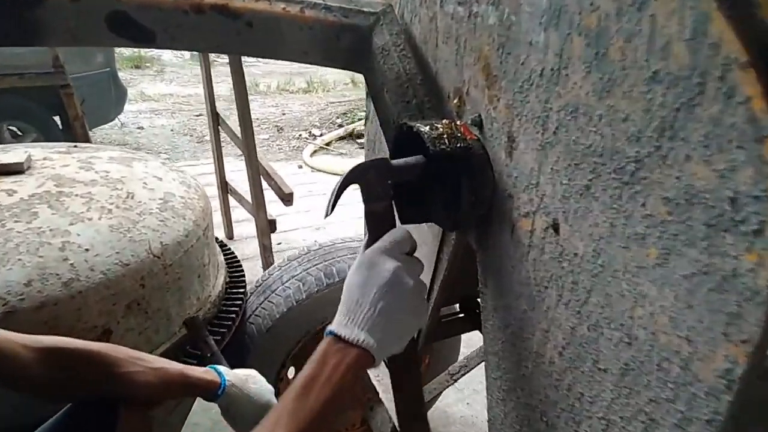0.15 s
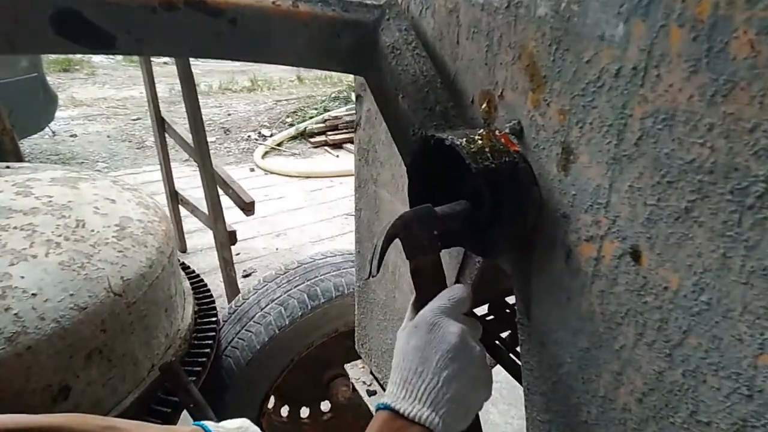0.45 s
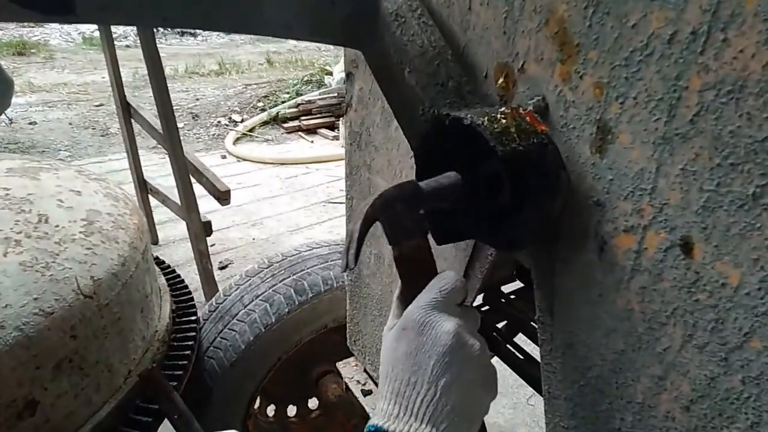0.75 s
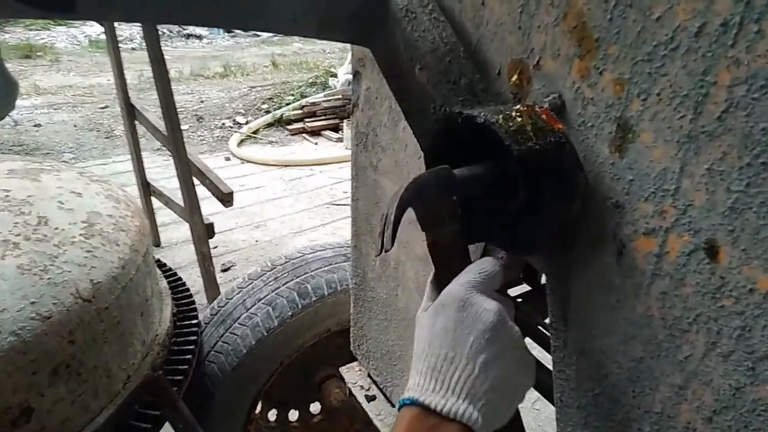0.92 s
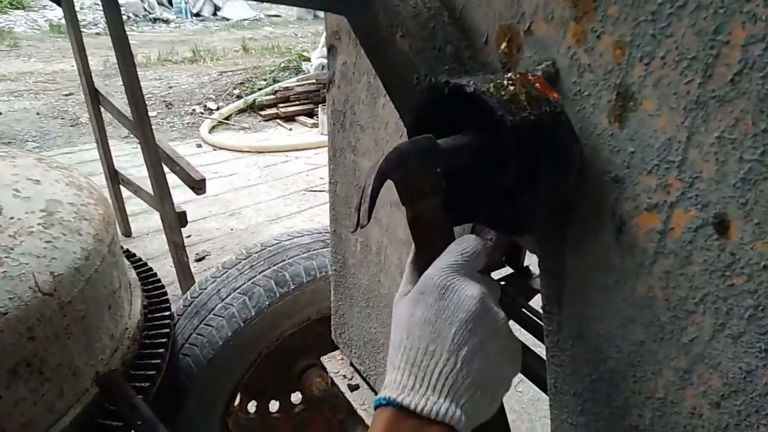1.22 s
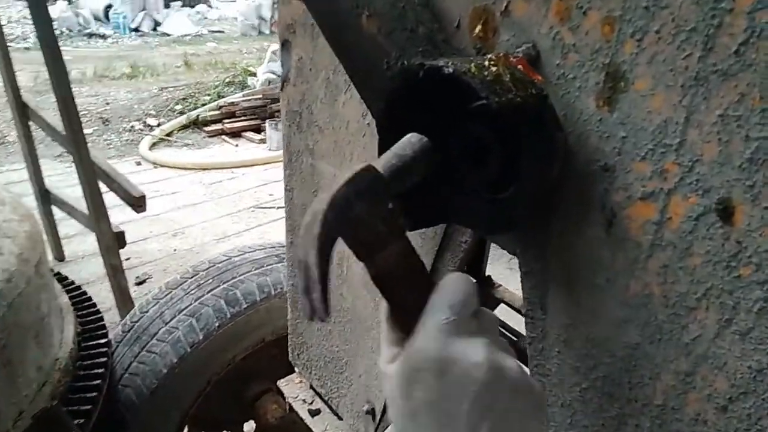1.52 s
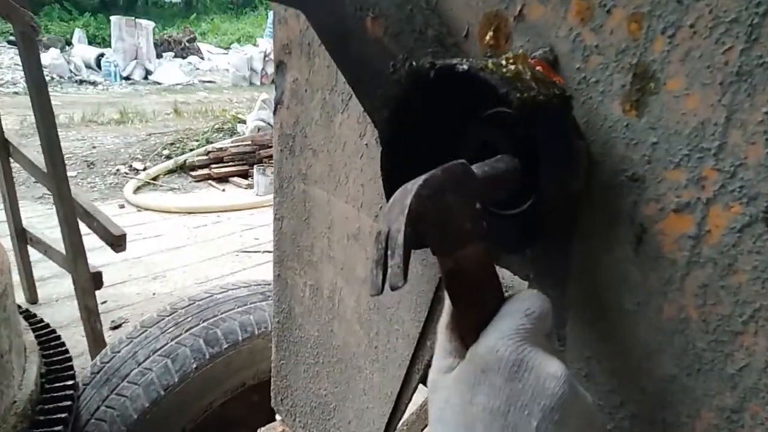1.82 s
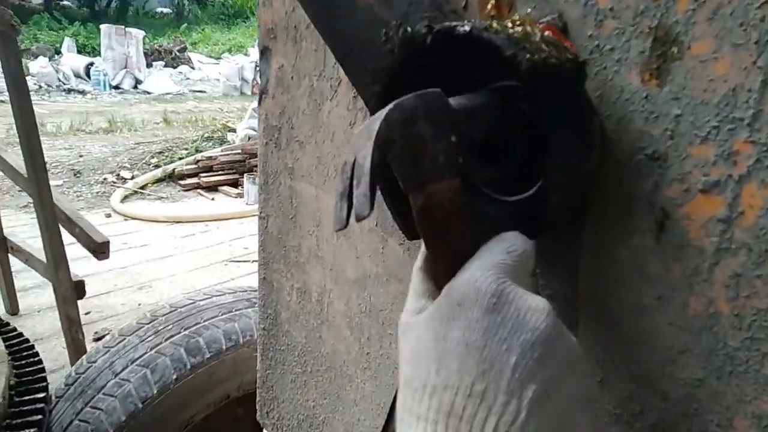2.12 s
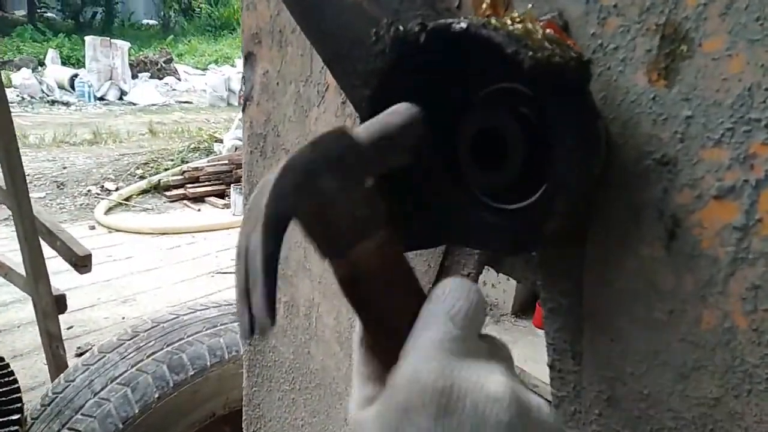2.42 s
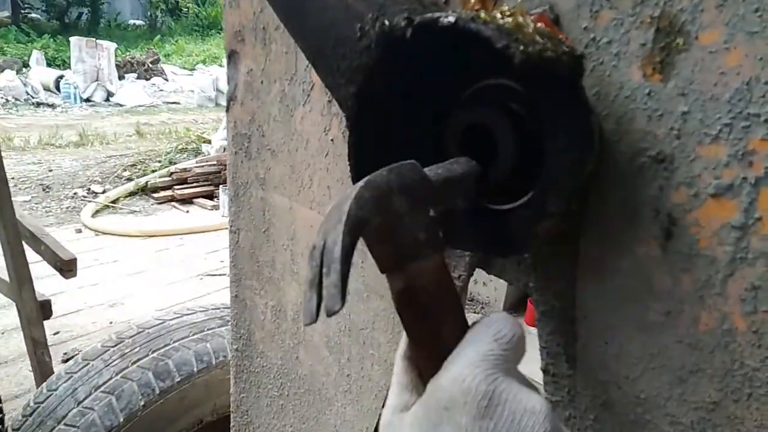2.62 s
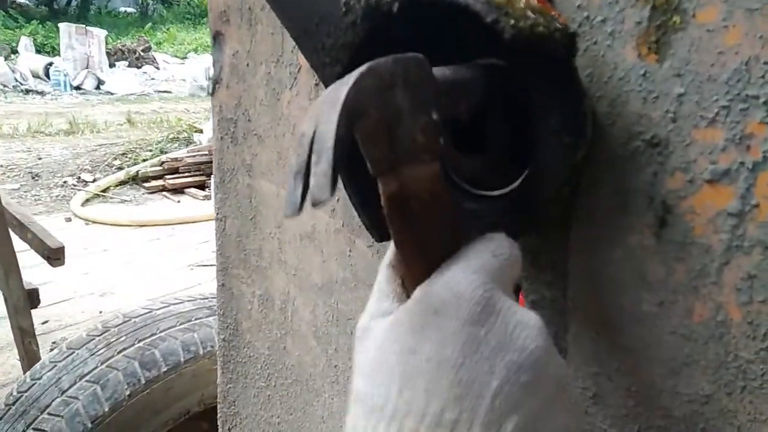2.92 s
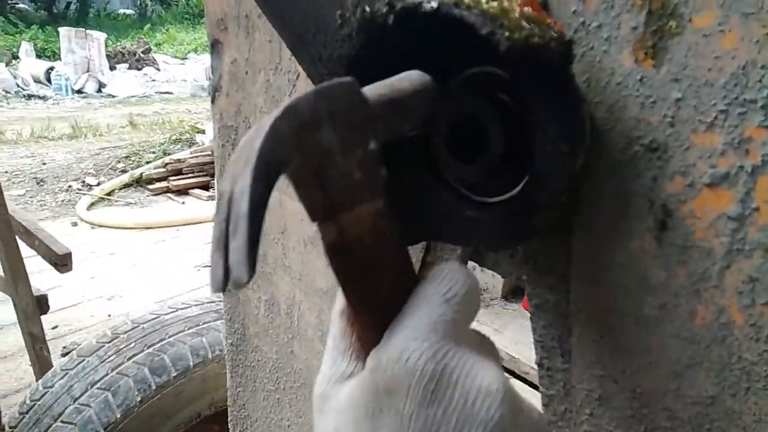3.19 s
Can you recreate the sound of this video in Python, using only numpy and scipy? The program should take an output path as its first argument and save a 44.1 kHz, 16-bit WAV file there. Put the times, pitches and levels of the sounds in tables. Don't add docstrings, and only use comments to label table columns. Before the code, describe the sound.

Hammer blows on steel crack and ring, driving a bearing into its housing with plate booming

```python
import sys
import numpy as np
from scipy import signal
from scipy.fft import rfft, irfft, next_fast_len
from scipy.io import wavfile
from scipy.ndimage import uniform_filter1d, map_coordinates

SR = 44100
rng = np.random.default_rng(int(sys.argv[2]) if len(sys.argv) > 2 else 0)


def store_pcm(level_fs):
    pcm = np.round(np.clip(level_fs, -1, 1) * 32767).astype(np.int16)
    wavfile.write(sys.argv[1], SR, np.atleast_2d(pcm).T)


def amplitude_ratio(level_db):
    exponent = np.asarray(level_db, float) / 20
    return 10 ** exponent


N = 147735
LEAD_S = 0.3

# (time [s], force [dB], brightness [dB per octave], long bearing ring [dB], plate [dB])
BLOWS = [
    (-.11, -13, 1, -55, -0.5),
    (0.3565, -2.5, 1.5, -62, -1),
    (0.9325, 0, 1.1, -60, -2),
    (1.5938, -0.5, 0.6, -53, -1),
    (2.1002, -2, -0.1, -32.5, -0.5),
    (2.5057, 1.5, 0.3, -23.5, 0),
    (2.8935, -1, 0.3, -19.5, -2.5),
]


def unit(x):
    return x / np.sqrt(np.mean(x ** 2) + 1e-20)


def along(points, hz):
    f, v = np.transpose(points)
    return np.interp(np.log(hz + 1), np.log(f + 1), v)


def wobble(rate, size):
    knots = rng.standard_normal(int(size / SR * 40) + 4)
    return map_coordinates(knots, [np.arange(size) * min(rate, 39) / SR])


def filtered(x, response):
    m = next_fast_len(len(x) + 8192)
    return irfft(rfft(x, m) * response(np.fft.rfftfreq(m, 1 / SR)), m)[:len(x)]


def rush(spectrum, size):
    noise = rng.standard_normal(size)
    return unit(filtered(noise, lambda hz: amplitude_ratio(along(spectrum, hz) - 60 * (hz < 18))))


def dying(spectrum, t60s, size, tilt_db, patchy_db=2.5):
    hz, t, z = signal.stft(rush(spectrum, size), SR, nperseg=256)
    clusters = unit(uniform_filter1d(rng.standard_normal(z.shape), 24, axis=1))
    tilt = tilt_db * np.log2(1 + hz / 2000)[:, None]
    decay = 60 * t / along(t60s, hz)[:, None]
    return signal.istft(z * amplitude_ratio(tilt + patchy_db * clusters - decay), SR, nperseg=256)[1][:size]


def ringing(modes, t, spread_db, drift, beat_db):
    smear_per_s = 30
    out = np.zeros(len(t))
    for hz, db, t60 in modes:
        level_db = db + spread_db * rng.normal() + beat_db * wobble(smear_per_s, len(t))
        phase = 2 * np.pi * hz * t + drift * wobble(smear_per_s, len(t))
        out += amplitude_ratio(level_db - 60 * t / t60) * np.sin(phase)
    return out


def add(track, s, x):
    part = track[round((s + LEAD_S) * SR):][:len(x)]
    part += x[:len(part)]


def crack(t):
    level_db, t60 = -5, 0.0046
    return amplitude_ratio(level_db - 60 * t / t60) * rush([(2000, -36), (9000, -26), (14000, 22)], len(t))


def clang(t, clang_db, tilt_db):
    # (frequency [Hz], density [dB per Hz])
    colour = [(59, -11), (100, -4.5), (891, -12.5), (1030, -8), (1480, -8), (1680, -9.5), (5650, -21),
              (8280, -19), (16000, -13)]
    # (frequency [Hz], t60 [s])
    t60s = [(300, 0.18), (2000, 0.3), (8000, .13), (14000, 0.07)]
    return amplitude_ratio(-6 + clang_db) * dying(colour, t60s, len(t), tilt_db)


def plate_boom(t, plate_db, lasts, tilt_db):
    # (frequency [Hz], density [dB per Hz])
    colour = [(35, -42), (60, -21), (180, -5.5), (408, -8.5), (515, -2.5), (749, -2.5), (5720, -25.5),
              (7060, -21.5), (16000, -25.5)]
    # (frequency [Hz], t60 [s])
    t60s = [(100, 1.58), (400, 0.87), (1500, 0.69), (5000, 0.48), (14000, 0.36)]
    rise_s = 0.072
    boom = dying(colour, np.multiply(t60s, [1, lasts]), len(t), tilt_db)
    return amplitude_ratio(-12 + plate_db) * boom * (1 - np.exp(-t / rise_s))


def struck_tones(t, s, ring_db, level_db, head_db):
    # (frequency [Hz], level [dB], t60 [s])
    housing = [(200.1, -22.5, 1), (247, -32.5, 1), (527.4, -28, 0.86), (590, -23, 0.95), (688.5, -20, 0.56),
               (741, -21, 0.65), (1039, -19.5, 0.68), (1620, -25, 0.66), (2323, -22.5, 0.43),
               (3063, -49, 0.14), (3620, -41, 0.4), (1190, -28, 0.71), (8030, -43, 0.35), (177, -29, 1)]
    # (blow time [s], frequency [Hz], level [dB], t60 [s])
    chance = [(-.11, 7800, -41, 0.42), (-.11, 3160, -42, 1.48), (.356, 1686, -6.5, 0.2),
              (.356, 2100, -17, .25), (.356, 3400, -14, 0.11), (.356, 1026, -14.5, 0.4),
              (.356, 8400, -15, 0.11), (.356, 3850, -23, 0.26), (.356, 9100, -13, 0.081),
              (.932, 630, -14.5, 0.43), (.932, 1034, -18, 0.11), (.932, 907, -21, 0.45),
              (.932, 1645, -5.5, 0.12), (.932, 2267, -5.5, 0.1), (.932, 3063, -27, 0.28),
              (.932, 4300, -10.5, 0.056), (.932, 7300, -19, 0.081), (1.593, 1034, -9, 0.3),
              (1.593, 2260, -13, 0.2), (1.593, 3666, -4, 0.061), (1.593, 4000, -13.5, 0.1),
              (1.593, 2600, -15, 0.2), (1.593, 2950, -19, 0.14), (1.593, 4380, -13, 0.08),
              (1.593, 5500, -28, 0.1), (2.1, 1590, -13, 0.23), (2.1, 1053, -18, 0.18),
              (2.1, 3800, -13.5, 0.075), (2.1, 4670, -6, 0.05), (2.1, 4300, -15, 0.051),
              (2.1, 2300, -9, 0.15), (2.1, 7860, -23, 0.22), (2.506, 188.3, -21.5, 0.6),
              (2.506, 1040, -11, 0.11), (2.506, 2312, -13.5, 0.26), (2.506, 4740, -8, 0.086),
              (2.506, 3810, -7, 0.051), (2.506, 3030, -22, 0.36), (2.506, 1760, -11, 0.096),
              (2.506, 4230, -16, 0.07), (2.893, 976, -4, 0.042), (2.893, 1350, -27, 0.16),
              (2.893, 4750, 2, 0.037), (2.893, 8160, -14.5, 0.13), (2.893, 8360, -19, .08),
              (2.893, 194, -22, 0.64)]
    # (frequency [Hz], density [dB per Hz])
    head = [(7000, -28), (7900, -6), (8500, 0), (9300, -4.5), (10300, -20)]
    head_t60 = 0.44
    own = [mode for blow_s, *mode in chance if abs(blow_s - s) < 0.1]
    bearing, thud = (6923, ring_db, 0.75), (55, -18, 0.048)  # (frequency [Hz], level [dB], t60 [s])
    tones = amplitude_ratio(level_db) * ringing(housing, t, spread_db=1, drift=2, beat_db=3)
    tones += ringing(own, t, spread_db=0, drift=1.1, beat_db=3)
    tones += ringing([bearing, thud], t, spread_db=0, drift=0.09, beat_db=0)
    tones += amplitude_ratio(head_db - 60 * t / head_t60) * rush(head, len(t))
    return tones * (1 - np.exp(-t / 0.0023))


def hammer(size):
    head_dbs = [-33.5, -26, -43, -41, -35, -34, -31]
    # (clang [dB], housing [dB], plate decay over its usual length [ratio])
    landing = [(2, 3, 1.06), (-0.5, 0, 1.03), (-0.5, 1.5, 0.97), (1.5, 0, 1.003), (1.5, -1.3, 1.004),
               (3.7, -1, 1.02), (0.7, -0.5, 1.028)]
    # (frequency [Hz], width [octaves], level [dB])
    wakes = [(1500, 0.86, 3.5), (2590, 1, 1.5), (1140, 1, 2), (2930, 0.73, 0), (3530, 1, 0.5),
             (3000, 0.7, 0), (380, 0.73, 3)]
    out, t = np.zeros(size), np.arange(SR) / SR
    for blow, head_db, place, (mid_hz, octaves, mid_db) in zip(BLOWS, head_dbs, landing, wakes):
        s, force_db, tilt_db, ring_db, plate_db = blow
        clang_db, housing_db, lasts = place

        def woken(hz):
            return amplitude_ratio(mid_db * np.exp(-(np.log2((hz + 1) / mid_hz) / octaves) ** 2))

        body = clang(t, clang_db, tilt_db) + plate_boom(t, plate_db, lasts, tilt_db)
        tones = struck_tones(t, s, ring_db, plate_db + housing_db, head_db)
        add(out, s, amplitude_ratio(force_db) * (crack(t) + filtered(body, woken) + tones))
    return out


def jolts(size):
    pushes = [0.017, 0.00097, 0.022, 0.0022, 0.025, 0.0093, 0.035]
    dip_s, back_s, back = 0.03, 0.039, 0.94
    out, t = np.zeros(size), np.arange(SR // 2) / SR
    u, v = t / dip_s, t / back_s / 3
    swing = back * (v * np.exp(1 - v)) ** 3 - 1.1 * (u * np.exp(1 - u)) ** 2
    for (s, *_), push in zip(BLOWS, pushes):
        add(out, s, push * swing)
    return out


def yard(size):
    # (frequency [Hz], density [dB per Hz])
    hum = [(15, 0), (25, -40), (185, -11.5), (317, -18.5), (695, -14), (840, -26), (1040, -22), (5730, -49),
           (16000, -58)]
    # (frequency [Hz], density [dB per Hz])
    buffeting = [(20, 24), (45, 20.5), (110, 21), (250, -25)]
    # (time [s], level [dB])
    wind = [(0.0, -46), (0.09, -62), (0.56, -40), (0.58, -38), (0.71, -48), (0.94, -35), (1.0, -43),
            (1.24, -38.5), (1.29, -47), (1.41, -36.5), (1.44, -48), (1.6, -27), (1.62, -34), (1.85, -37.5),
            (1.98, -57), (2.01, -37), (3.26, -43), (3.35, -44)]
    wind_db = np.interp(np.arange(size) / SR - LEAD_S, *np.transpose(wind))
    gusts = unit(amplitude_ratio(0.33 * wobble(24.87, size)) * rush(buffeting, size))
    far = amplitude_ratio(-46 + 2.5 * wobble(3.357, size)) * rush(hum, size)
    return far + amplitude_ratio(-5 + wind_db) * gusts


def flakes(size):
    # (time [s], peak level [dB])
    ticks = [(0.0324, -49), (0.0762, -43), (0.1151, -56), (0.13, -46), (0.26, -55), (0.6679, -41),
             (0.7168, -48), (0.7506, -47.5), (0.768, -45.5), (0.8544, -43.5), (0.8784, -66), (0.9023, -47),
             (1.0276, -34), (1.1877, -40), (1.297, -38.5), (1.3225, -42), (1.38, -43.5), (1.4935, -56),
             (1.508, -37.5), (1.562, -39), (1.6935, -23), (1.888, -41), (1.9035, -39.5), (1.953, -40.5),
             (2.0385, -42.5), (2.05, -49), (2.364, -36), (2.376, -39), (2.4169, -42.5), (2.45, -48),
             (2.466, -42), (2.477, -40), (2.683, -30), (2.745, -33), (2.755, -46), (2.7671, -33),
             (2.822, -40.5), (2.8474, -39), (2.873, -33), (3.1213, -45), (3.223, -41), (3.234, -42),
             (3.26, -38.5), (3.285, -45), (3.32, -55), (3.345, -51)]
    # (frequency [Hz], density [dB per Hz])
    colour = [(1500, -11), (4000, -3.5), (8500, -4), (11500, -8), (14500, -9), (16000, 4.5)]
    tick_t60, tail_t60, tail_db, all_db = 0.032, 0.22, -6.5, -4.5
    out, t = np.zeros(size), np.arange(SR // 5) / SR
    tick = amplitude_ratio(-60 * t / tick_t60) * np.minimum(t / 0.0015, 1)
    tail = amplitude_ratio(tail_db - 60 * t / tail_t60)
    for s, db in ticks:
        add(out, s, amplitude_ratio(db + all_db) * (tick + tail) * rush(colour, len(t)))
    return out


def singing(size):
    # (blow time [s], frequency [Hz], level [dB], t60 [s])
    thin = [(.356, 593, -23.5, 0.76), (.356, 2520, -24, .3), (.356, 4250, -27, .2), (.932, 1136, -26, 0.67),
            (.932, 8100, -29, 0.27), (0.931, 6000, -19, .12), (1.593, 3667, -11, .1),
            (1.593, 3730, -23, 0.36), (1.593, 4750, -18, 0.095), (1.593, 7240, -26, 0.33),
            (1.593, 3460, -27.5, .4), (2.099, 4760, -29, 0.43), (2.101, 8030, -28, 0.44),
            (2.1, 8100, -13, 0.034), (2.506, 4740, -30, 0.42), (2.506, 3640, -31, .35),
            (2.894, 4800, -30, 0.38), (2.893, 8200, -29, .35)]
    out, t = np.zeros(size), np.arange(SR) / SR
    for s, *mode in thin:
        tone = ringing([mode], t, spread_db=0, drift=0.5, beat_db=2)
        add(out, s, tone * (1 - np.exp(-t / 0.003)))
    return out


def handling(size):
    # (time [s], level [dB])
    bumps = [
        (0.592, -39),
        (1.215, -27),
    ]
    bump_hz, bump_s = 88, 0.0115
    out, t = np.zeros(size), np.arange(SR // 10) / SR
    bump = np.exp(-(t / bump_s - 3) ** 2) * np.sin(2 * np.pi * bump_hz * t)
    for s, db in bumps:
        add(out, s - 3 * bump_s, amplitude_ratio(db) * bump)
    return out


def squeak(size):
    start_s, length_s, start_hz, rise_hz, level_db = 1.56, 0.035, 1080, 170, -43
    out, t = np.zeros(size), np.arange(SR // 10) / SR
    u = np.clip(t / length_s, 0, 1)
    tone = np.sin(2 * np.pi * np.cumsum(start_hz + rise_hz * u) / SR)
    add(out, start_s, amplitude_ratio(level_db) * u * (u < 1) * tone)
    return out


def scene():
    size = N + round(LEAD_S * SR)
    mix = hammer(size) + yard(size) + flakes(size) + singing(size) + handling(size) + squeak(size)
    return mix[None, -N:]


def port(x):
    # (frequency [Hz], width [Hz], level [dB])
    bands = [(8420, 990, 6.5), (14370, 1800, 4.5), (4000, 270, 2.5), (5640, 270, -0.5)]
    return filtered(x, lambda hz: amplitude_ratio(sum(db * np.exp(-((hz - mid) / width) ** 2) for mid, width, db in bands)))


def ducked(x, knee_db, share, sense_s, release_db_per_s):
    span = round(sense_s * SR)
    power = uniform_filter1d(x ** 2, span, origin=span // 2 - 40)
    level_db = 10 * np.log10(np.abs(power) + 1e-12)
    fall = release_db_per_s * np.arange(N) / SR
    held_db = np.maximum.accumulate(level_db + fall) - fall
    return x * amplitude_ratio(uniform_filter1d(-share * np.maximum(held_db - knee_db, 0), 32))


def hushed(x):
    hush_s, hush_db, hush_hz = 0.012, -12, 2600
    t = np.arange(N) / SR
    before = sum((t > s - hush_s) & (t < s - 0.0015) for s, *_ in BLOWS)
    treble = filtered(uniform_filter1d(1.0 * before, size=88) * x, lambda hz: hz > hush_hz)
    return x - (1 - amplitude_ratio(hush_db)) * treble


def soft_clip(x, ceiling=0.28):
    return x / (1 + np.abs(x / ceiling) ** 4) ** (1 / 4)


def band_limit(x):
    top_hz, edge_hz, over_db = 15850, 90, -36
    return filtered(x, lambda hz: amplitude_ratio(over_db * (1 + np.tanh((hz - top_hz) / edge_hz)) / 2))


def top_cut(x):
    return signal.sosfilt(signal.butter(12, 16990, fs=SR, output="sos"), x)


def record(dry):
    x = port(dry[0])
    x = ducked(x, knee_db=-28.5, share=0.59, sense_s=0.053, release_db_per_s=148)
    x = ducked(x, knee_db=-21, share=0.79, sense_s=0.002, release_db_per_s=521)
    x = x + jolts(N + round(LEAD_S * SR))[-N:]
    x = band_limit(soft_clip(hushed(x)))
    return top_cut(x[None])


dry = scene()
out = record(dry)
store_pcm(out)
```